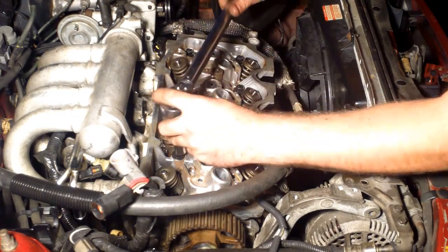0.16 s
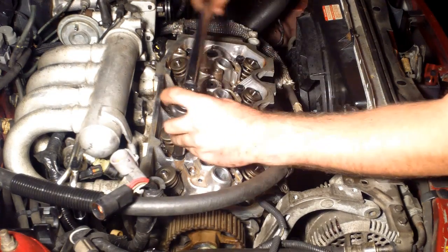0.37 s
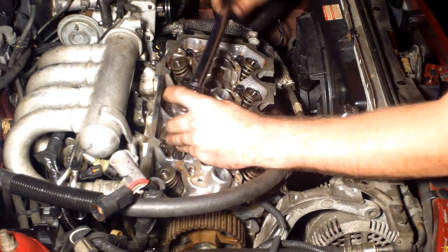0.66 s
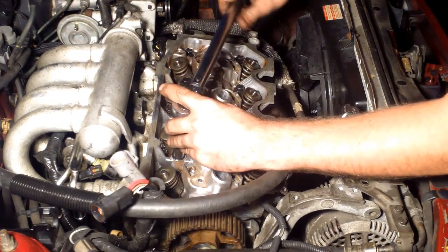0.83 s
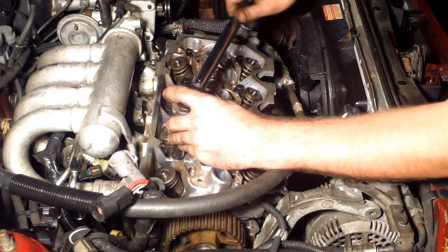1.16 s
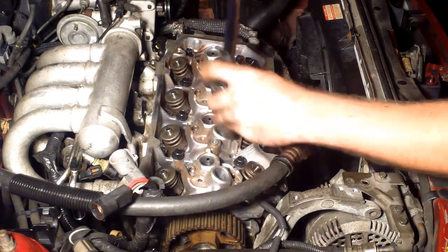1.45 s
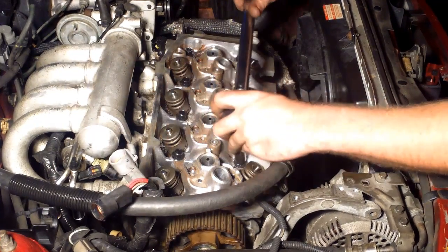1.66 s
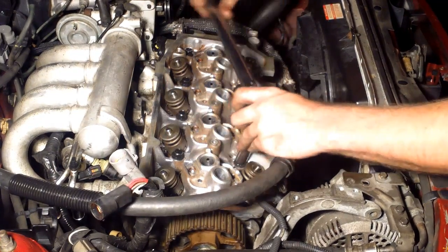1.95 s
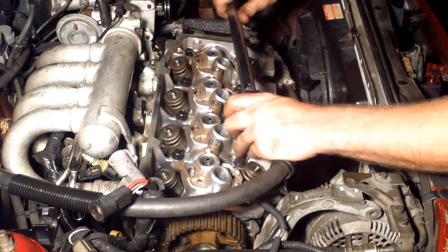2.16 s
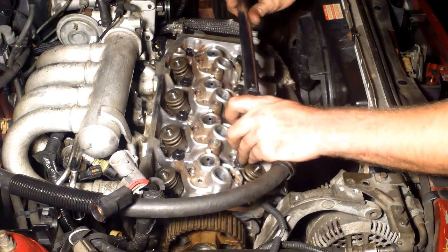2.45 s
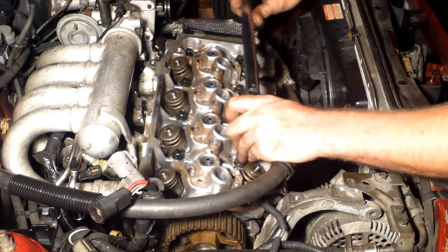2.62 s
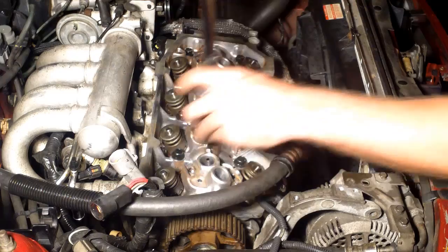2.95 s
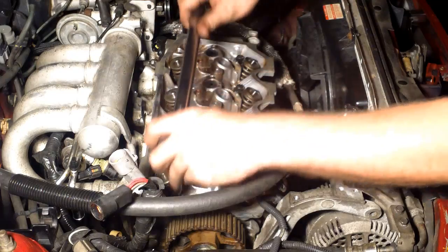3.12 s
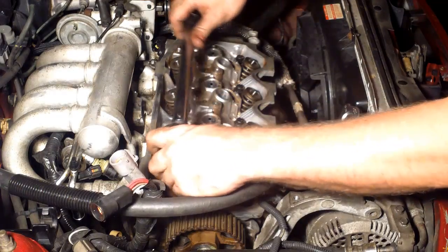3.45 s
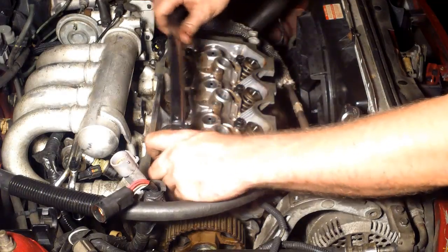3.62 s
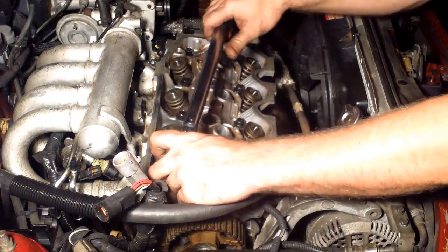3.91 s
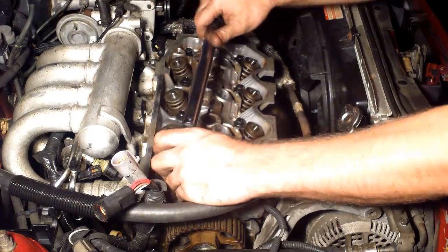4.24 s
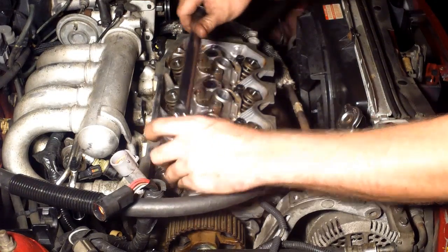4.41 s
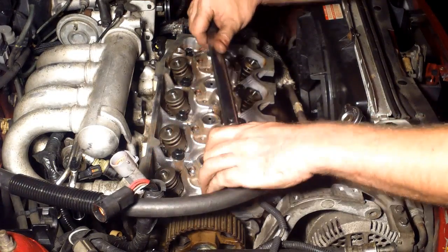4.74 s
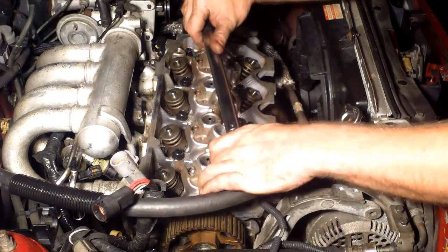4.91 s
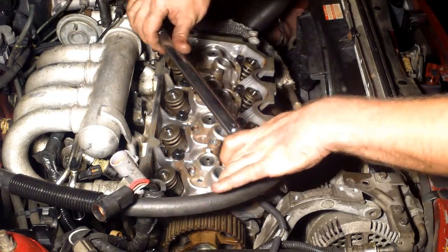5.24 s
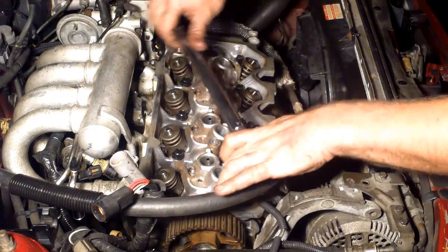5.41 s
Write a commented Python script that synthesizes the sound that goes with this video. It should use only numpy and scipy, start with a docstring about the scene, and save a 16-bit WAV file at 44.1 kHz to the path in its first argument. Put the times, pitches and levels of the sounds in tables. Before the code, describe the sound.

Steel ratcheting in a workshop, recorded close in mono. Loud cracks come roughly every half second, early ones clustered, with small pawl ticks, socket knocks and faint scrapes between. Each is a bright midrange snap that dies within a tenth of a second. A deep, unsteady engine-like hum and dull room noise swell in the gaps and drop under the strongest clicks. A rapid clatter comes shortly before the end.

```python
"""A hand works a torque wrench over the bolts of an engine head: pawl, socket and release clicks, close by.
Clicks are noise bursts in three ranges, with sine rings and tocks; sliding steel is enveloped noise.
Behind them an idling engine drones on wavering harmonics over the shaped-noise rumble and hiss of a workshop.
The background sinks at set moments, mostly at loud clicks, stays down briefly and climbs back."""
import sys
import numpy as np
from scipy import signal
from scipy.fft import rfft, irfft
from scipy.io import wavfile
from scipy.ndimage import uniform_filter1d

SR = 44100
rng = np.random.default_rng(int(sys.argv[2]) if len(sys.argv) > 2 else 0)


def unload_wav(signal):
    """Save mono or channel-first audio to the path in sys.argv[1] as 16-bit WAV at rate SR, clipped to [-1, 1]."""
    wavfile.write(
        sys.argv[1],
        SR,
        np.round(np.clip(np.atleast_2d(signal).T, -1, 1) * 32767).astype(np.int16),
    )


def invert_db(x):
    """Field ratio 10**(x/20) for x, a level in decibels (scalar or array-like)."""
    u = np.asarray(x, float) / 20
    return 10 ** u


N = 245769


def evened(x):
    """Scales to rms 1."""
    return x / np.sqrt(np.mean(x ** 2) + 1e-20)


def read_spectrum(points, hz):
    """Interpolates a spectrum on a log-frequency axis."""
    f, value = np.transpose(points)
    return np.interp(np.log(hz + 1), np.log(f + 1), value)


def columns(rows):
    """Interpolates every column of a time table at every sample."""
    s, *values = np.transpose(rows)
    return [np.interp(np.arange(N) / SR, s, v) for v in values]


def coloured(points, count, lo_hz, hi_hz):
    """Noise with the given spectrum, rms 1 between lo_hz and hi_hz."""
    hz = np.fft.rfftfreq(count, 1 / SR)
    z = rfft(rng.standard_normal(count)) * invert_db(read_spectrum(points, hz))
    inside = irfft(z * (hz > lo_hz) * (hz < hi_hz), count)
    return irfft(z, count) / inside.std()


def wander(hz):
    """Slow random curve, mostly below hz, rms 1."""
    lowpass = 1 / (1 + (np.fft.rfftfreq(N, 1 / SR) / hz) ** 4)
    return evened(irfft(rfft(rng.standard_normal(N)) * lowpass, N))


# clicks: t/s, relative level/dB, rattle t60/s, low knock/dB, treble/dB (both against the middle range)
CLICKS = [(0.1445, -6, 0.043, -17.5, -22.5), (.1557, -24.5, 0.076, -13, -9.5),
          (0.2815, -29.5, 0.13, -4, -12), (0.2915, -14, 0.052, -6.5, -7), (.2974, -10.5, 0.048, -41, -20),
          (0.436, -47, 0.056, -12, -5), (0.444, -47, 0.055, -6, -2), (0.4858, -24, 0.13, -9.5, -9),
          (0.5071, -23.5, 0.11, -11, -6), (0.5198, -13.5, 0.06, -25, -15), (0.525, -17, 0.052, -13.5, -2.5),
          (0.6215, -28, 0.047, -13.5, -21), (.6768, -37.5, .11, 1, -18), (.6867, -25.5, 0.15, -13, -18.5),
          (0.691, -30, 0.065, 3.5, -30), (.712, -31.5, 0.039, -26, -11), (.992, -9, 0.043, -9.5, -7.5),
          (1.1373, -29, 0.065, -9.5, -18), (1.1447, -31, .043, -29, -20), (1.2735, -45.5, 0.087, -7, -11),
          (1.289, -47.5, .06, -1, -8), (1.3585, -39, 0.064, -5.5, -10), (1.689, -10, 0.08, -11.5, -23.5),
          (1.6929, -18.5, 0.032, -29, -33), (1.6984, -15.5, 0.057, -25, -8),
          (1.899, -42.5, 0.066, -9.5, -12), (1.937, -40.5, .055, -15, -8), (1.9756, -19, .11, -11, -11),
          (1.9964, -18, .11, -9.5, -18), (2.0093, -18.5, 0.05, -16, -5), (2.0172, -24.5, 0.036, -10.5, -18),
          (2.104, -38, 0.059, -10, -19), (2.128, -34.5, .065, -6, -13), (2.1504, -35.5, 0.15, -8.5, -17),
          (2.2017, -42, 0.078, -2, -11), (2.5226, -9.5, 0.038, -9, -8), (2.6564, -29.5, 0.041, -10.5, -17),
          (2.814, -36.5, .085, -5, -12), (2.8262, -31, 0.06, -11, -13), (3.015, -44.5, 0.061, 0, -7),
          (3.082, -38, 0.032, 3, -30), (3.2397, -10, 0.048, -9.5, -15), (3.2498, -10.5, 0.079, -17.5, -18),
          (3.433, -32, 0.073, -6.5, -31), (3.4465, -27, 0.068, -6, -10.5), (3.487, -28.5, 0.049, -8, -16),
          (3.525, -14, 0.049, -10, -6.5), (3.704, -24, 0.09, -3.5, -15.5),
          (3.7815, -28, 0.056, -1.5, -12.5), (4.0178, -10.5, .043, -8, -7), (4.1756, -46.5, 0.057, 4, -12),
          (4.4037, -46, 0.085, 6, -11), (4.4224, -35.5, 0.11, -2, -25), (4.4455, -24.5, 0.05, -9.5, -18.5),
          (4.6384, -34, 0.049, -1, -10), (4.6509, -22.5, 0.066, -0.5, -17), (4.661, -23.5, 0.041, -2, -7),
          (4.6925, -10, 0.053, -15.5, -17), (4.7041, -26.5, 0.12, -0.5, -9),
          (4.879, -36.5, 0.074, -1.5, -26), (4.98, -15, 0.083, -10.5, -24.5), (5.029, -41.5, 0.045, 9, -25),
          (5.1118, -38.5, 0.058, 5, -23), (5.234, -24.5, 0.056, -7.5, -21), (5.2554, -23, 0.062, -5, -27),
          (5.2689, -19.5, 0.031, -2, -7), (5.2826, -15.5, 0.033, -4.5, -15), (5.2952, -20, 0.059, -7, -14),
          (5.3075, -25, 0.045, -0.5, -19), (5.4653, -36, 0.054, 7, -7), (5.5102, -38, 0.035, -5, -4)]
# blows that leave the steel ringing: t/s, handle/dB, head/dB, pawl/dB, socket/dB
RINGS = [(.1445, -42, -46, -46, -70), (.2916, -69, -48, -41, -51), (.4858, -68, -55, -54, -29.5),
         (.5085, -70, -54, -62, -25.5), (.526, -64, -60, -49, -55), (.9943, -51, -41, -66, -50),
         (1.689, -61, -55, -38.5, -70), (1.975, -58, -56, -56, -35.5), (2.5216, -59, -46, -68, -57),
         (3.2385, -49, -43, -47, -46), (3.526, -55, -51, -54, -39), (4.0165, -48, -43, -58, -50),
         (4.662, -70, -70, -70, -43), (4.98, -41, -47, -64, -70), (5.269, -70, -70, -70, -16.5),
         (5.283, -70, -70, -70, -38)]
# blows in which one short mode of socket or bolt stands out: t/s, level/dB, f/Hz
TOCKS = [(0.146, -29.5, 1670), (.292, -40, 1330), (0.692, -39, 1450), (0.992, -34, 1660),
         (1.138, -45, 1310), (1.997, -31, 3480), (2.01, -27, 3600), (2.523, -28, 2260),
         (2.656, -50.5, 1304), (2.815, -55, 1300), (3.526, -31, 2060), (3.781, -32.5, 2300),
         (4.018, -22, 2600), (4.176, -55, 1345), (4.691, -31, 1710), (4.981, -30, 1650)]


def wrench():
    """Sums the clicks, rings and tocks of steel on steel, each at its moment."""
    out = np.zeros(N + SR)
    for voice, table in ((click, CLICKS), (ring, RINGS), (tock, TOCKS)):
        for s, *blow in table:
            out[round(s * SR):][:SR // 2] += voice(*blow)
    return out[:N]


# noise spectrum of struck or rubbed steel: f/Hz, relative density/(dB per Hz)
CRACK = [(410, -60), (700, -29), (1360, -28.5), (1840, -17.5), (2560, -9), (3380, -5.5), (3630, -1),
         (4740, 1), (5290, 1.5), (5900, -8.5), (6420, -10), (8370, -12.5), (11200, -9), (12000, -15),
         (12600, -27), (16400, -76.5), (22000, -120)]
# short-lived resonances of wrench and bolt heads, before each blow's scatter: f/Hz, width/Hz, level/dB
BODY = [(1235, 290, -2.5), (1617, 250, -3), (2010, 130, -0.5), (2289, 210, -2.5), (2605, 31, 2),
        (2860, 29, 3), (3190, 170, 1.5), (3473, 122, 5), (3770, 79, 6), (4110, 67, 7.5), (4383, 70, -0.5),
        (4430, 120, 3), (4770, 280, -3.5), (4803, 140, 2), (5213, 116, 5.5), (5695, 350, -23.5),
        (6344, 600, -0.5), (6790, 45, -17), (7440, 89, -6), (9840, 220, -21), (10840, 580, -32)]
# blows with less treble favour a higher middle pitch
FAVOURED_HZ, DULLER_HZ_PER_DB, FAVOURED_SPREAD_HZ = 4080, 47.5, 120


def click(level_db, t60, knock_db, treble_db):
    """A sharp tick, then a decaying rattle of steel and a faint echo, in three ranges."""
    t = np.arange(SR // 2) / SR
    hz = np.fft.rfftfreq(len(t), 1 / SR)
    z = rfft(coloured(CRACK, len(t), 2800, 6500))

    favoured_hz = FAVOURED_HZ + DULLER_HZ_PER_DB * np.clip(-treble_db, 5, 22)
    favoured_hz += FAVOURED_SPREAD_HZ * rng.standard_normal()
    z *= 0.5 + 0.87 / (1.5 + ((hz - favoured_hz) / 250) ** 2)
    struck = invert_db(3.5 * rng.standard_normal(len(BODY)))  # each blow lands on another spot
    z *= 0.5 + sum(gain * invert_db(db) / (1 + (2 * (hz - f) / width) ** 2)
                   for gain, (f, width, db) in zip(struck, BODY))

    low = 1 / (1 + (hz / 2800) ** 12)
    high = 1 / (1 + (6500 / (hz + 1)) ** 16)
    knock, body, treble = (evened(irfft(z * part, len(t))) for part in (low, 1 - low - high, high))

    t60 = np.clip(t60, 0.01, 0.4)
    rise = 1 - np.exp(-t / 0.00039 * invert_db(0.22 * (level_db + 14)))  # weak blows start more softly
    tick_decay = invert_db(-60 * t / 0.014)
    tick = 0.9 * tick_decay
    echo = invert_db(-31 - 60 * t / 0.5) * (1 - np.exp(-t / 0.004))  # thrown back by engine bay and shop
    # loose parts bounce unevenly
    chatter = invert_db(1.35 * evened(uniform_filter1d(rng.standard_normal(len(t)), 90)))

    crack = body * (tick + invert_db(-60 * t / t60) * chatter + echo)
    knock_rattle = invert_db(-60 * t / (1.1 * t60)) * chatter
    crack += invert_db(knock_db) * knock * (0.37 * tick + knock_rattle + echo)
    treble_rattle = invert_db(-60 * t / (1.05 * t60)) * chatter
    crack += invert_db(treble_db) * treble * (1.34 * tick_decay + treble_rattle + 0.59 * echo)
    return invert_db(level_db - 10.5) * rise * crack


# modes of handle, head, pawl and socket in turn: f/Hz, level/dB, t60/s, scatter of f/Hz
STEEL = [
    [(2770, -6, .2, 15), (2815, 1, .24, 15)],
    [(4290, -2, .25, 60), (4400, 0, .2, 60), (4500, -2, .1, 60)],
    [(5206, 0, .33, 10), (6215, -4, .14, 25), (6290, -7, .2, 25)],
    [(9425, 0, .045, 0)],
]


def ring(*levels_db):
    """Dying tones of the steel; close ones beat, and each blow shifts most of them a little."""
    t = np.arange(SR // 2) / SR
    tones = np.zeros(len(t))
    for blow_db, part in zip(levels_db, STEEL):
        for hz, db, t60, scatter_hz in part:
            mode_hz = hz + scatter_hz * rng.standard_normal()
            tones += invert_db(blow_db + db - 60 * t / t60) * np.sin(2 * np.pi * (mode_hz * t + rng.random()))
    # the grip damps them unevenly
    flutter = invert_db(3.5 * evened(uniform_filter1d(rng.standard_normal(len(t)), 300)))
    return tones * flutter * (1 - np.exp(-t * 2000))


TOCK_T60_S = 0.035


def tock(db, hz):
    """One short mode: an exponentially decaying sine."""
    t = np.arange(SR // 2) / SR
    return invert_db(db - 60 * t / TOCK_T60_S) * np.sin(2 * np.pi * hz * t)


# steel slides on steel: start t/s, length/s, relative level/dB
SLIDES = [(0.622, .1, -64), (2.04, 0.1, -65), (2.972, 0.23, -62), (3.273, 0.22, -58), (4.406, 0.095, -58),
          (4.723, 0.086, -59)]
SLIDE_EDGE_S, SLIDE_HZ, SLIDE_WIDTH_HZ = 0.0049, 4500, 310


def slides():
    """Grainy hiss of rubbing steel with one resonance; starts fast and trails off."""
    t, hz = np.arange(N) / SR, np.fft.rfftfreq(N, 1 / SR)
    stroke = np.zeros(N)
    for s, length, db in SLIDES:
        rise, fall = (t - s) / SLIDE_EDGE_S, 2 * (s + length - t) / length
        stroke += invert_db(db) * np.clip(np.minimum(rise, fall), 0, 1)
    resonance = 0.7 + 2.3 / (1 + ((hz - SLIDE_HZ) / SLIDE_WIDTH_HZ) ** 2)
    hiss = irfft(rfft(coloured(CRACK, N, 3000, 6000)) * resonance, N)
    return stroke * invert_db(1.9 * wander(97)) * hiss


# idle before any dip: t/s, firing rate f/Hz, weaker multiples together/dB
IDLE = [(0, 45.66, -47), (.14, 45.1, -45), (.45, 40.75, -43), (1, 41.2, -41.5), (1.3, 40.92, -30),
        (1.65, 39.52, -28.5), (1.85, 40.48, -31), (2.28, 40.46, -33), (2.45, 40.23, -38), (3.1, 40.67, -32),
        (3.55, 40.17, -28.5), (3.8, 38.94, -33.5), (4.25, 36.7, -26), (4.6, 37.88, -28.5),
        (4.95, 39.03, -26), (5.25, 38.99, -33), (5.45, 38.16, -28), (5.57, 37.76, -26.5)]
# weaker multiples of the firing rate: multiple, level/dB against that sum
ORDER_DB = [(1, -11), (1.5, -33), (2.5, -26), (3, -8.5), (3.5, -16), (4, -6.5), (4.5, -14.5), (5, -7.5),
            (5.5, -12.5), (6, -26)]
# second multiple, the loudest, swells and drops out: t/s, rms level/dB before any dip
DRONE = [(0, -38), (.11, -29), (.34, -40.5), (.6, -32.5), (.8, -34), (1.02, -42.5), (1.08, -34),
         (1.27, -37.5), (1.47, -17), (1.54, -36.5), (1.61, -22.5), (1.69, -24), (1.78, -14), (1.89, -33.5),
         (1.97, -20), (2.34, -22.5), (2.55, -27), (3.05, -30.5), (3.26, -35), (3.44, -29), (3.58, -31),
         (3.8, -30.5), (4.24, -29), (4.45, -49), (4.65, -27.5), (4.93, -23), (5.2, -30.5), (5.35, -28.5),
         (5.43, -42), (5.51, -34), (5.57, -34)]


def engine(dip_db):
    """Sines at multiples of the firing rate; the second follows DRONE, the rest waver singly."""
    firing_hz, upper_db = columns(IDLE)
    turns = np.cumsum(firing_hz) / SR
    out = np.sqrt(2) * invert_db(columns(DRONE)[0]) * np.sin(2 * np.pi * 2 * turns)
    for multiple, db in ORDER_DB:
        level = np.sqrt(2) * invert_db(upper_db + db + 2.53 * wander(2.6))
        out += level * np.sin(2 * np.pi * (multiple * turns + rng.random()))
    return out * invert_db(dip_db)


# room rumble: f/Hz, relative density/(dB per Hz)
RUMBLE = [(12, -51), (22, 3), (50, -3), (70, 0.5), (86, -4), (105, -5.5), (133, -5.5), (209, -9),
          (260, -17.5), (329, -21), (702, -24), (905, -26), (1500, -28.5), (1950, -51), (3300, -120)]
# room hiss: f/Hz, relative density/(dB per Hz)
HISS = [(590, -9), (1000, -4), (1370, -10.5), (1760, 2), (1930, -3.5), (2680, -5.5), (3180, -6.5),
        (3430, -8), (4240, -3.5), (4610, -0.5), (5350, 0.5), (5850, -9.5), (6350, -10.5), (6900, -16),
        (11400, -16.5), (12100, -25), (12600, -60), (16400, -87), (22000, -120)]
# levels (300-1000 Hz, 3-6 kHz) before dips and lumps; share of a dip, in dB, that the hiss follows
RUMBLE_DB, HISS_DB, HISS_FOLLOWS = -47, -47.5, 0.89


def workshop(dip_db):
    """Shaped-noise rumble and hiss of the room, a little lumpy."""
    rumble_db = RUMBLE_DB + dip_db + 1.5 * wander(15)
    hiss_db = HISS_DB + HISS_FOLLOWS * dip_db + 0.8 * wander(20)
    rumble = invert_db(rumble_db) * coloured(RUMBLE, N, 300, 1000)
    return rumble + invert_db(hiss_db) * coloured(HISS, N, 3000, 6000)


# background dips: t/s, level sunk to/dB, stay/s
DIPS = [(0, -9, .2), (.148, -15.5, .2), (.296, -23, 0.34), (0.993, -23, .32), (1.694, -22, 0.44),
        (2.522, -24.5, 0.46), (3.245, -15, 0.21), (3.527, -25.5, 0.04), (4.019, -21, 0.41),
        (4.7, -10.5, 0.083), (4.985, -5.5, 0.051)]
SINK_S, CLIMB_S, CLIMB_SHAPE = 0.013, 0.27, 0.58  # the climb starts fast, then creeps


def dips_db():
    """Background gain: sinks quickly to each depth, waits, climbs back towards 0 dB."""
    out = np.zeros(N)
    for s, depth_db, stay_s in DIPS:
        at = round(max(s, 0) * SR)
        t = np.arange(N - at) / SR
        goal = depth_db * np.exp(-(np.maximum(t - stay_s, 0) / CLIMB_S) ** CLIMB_SHAPE)
        out[at:] = goal + (out[at] - depth_db) * np.exp(-t / SINK_S) * (at > 0)  # at 0 s: already down
    return out


def scene():
    """Wrench, engine and room at one microphone."""
    dip_db = dips_db()
    return (wrench() + slides() + engine(dip_db) + workshop(dip_db))[None]


def roll_off(x):
    """The treble ends steeply here."""
    return signal.sosfilt(signal.butter(12, 12790, fs=SR, output="sos"), x)


SELF_NOISE_DB = -72  # microphone's own even hiss; does not sink with the room


def record(dry):
    """The microphone rounds off the highest peaks and adds its hiss; then a band limit."""
    heard = 0.5 * np.tanh(2 * dry) + invert_db(SELF_NOISE_DB) * rng.standard_normal(dry.shape)
    lowpass = signal.firwin(301, 12100, window=("kaiser", 8), fs=SR)
    mix = signal.oaconvolve(heard, lowpass[None], "same")
    return roll_off(mix)


dry = scene()
out = record(dry)
unload_wav(out)
```